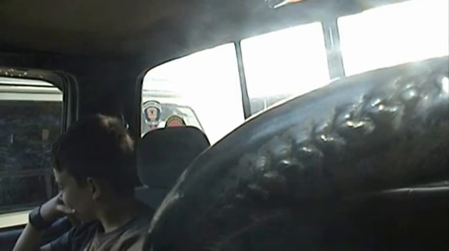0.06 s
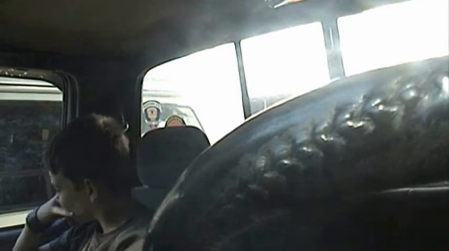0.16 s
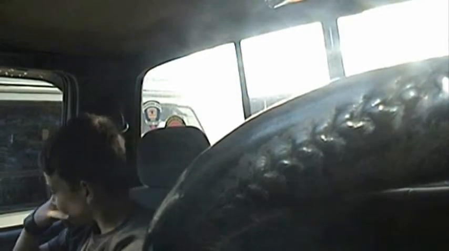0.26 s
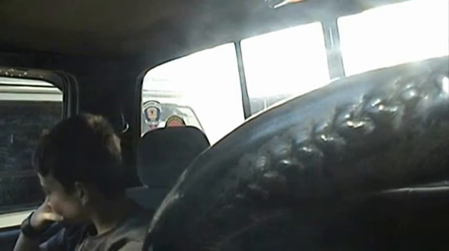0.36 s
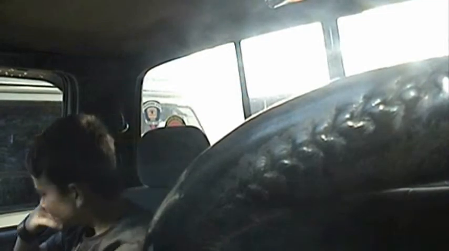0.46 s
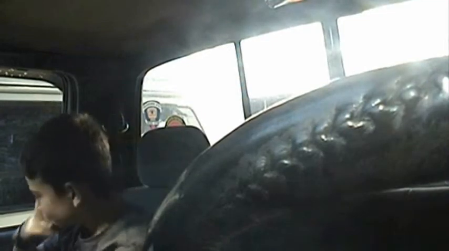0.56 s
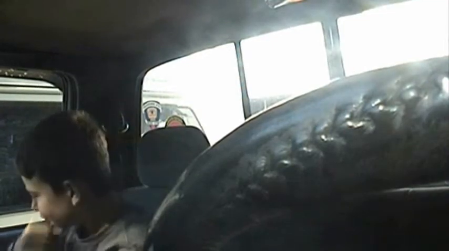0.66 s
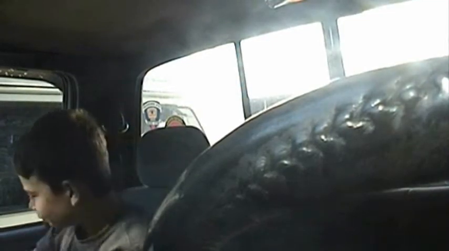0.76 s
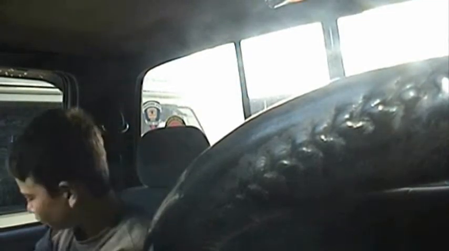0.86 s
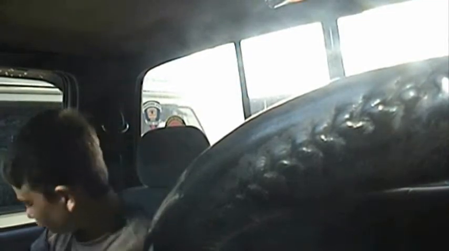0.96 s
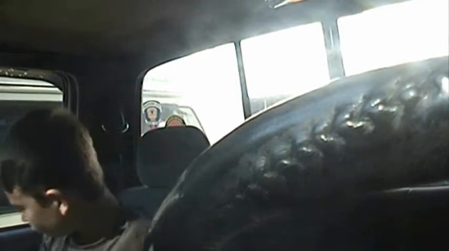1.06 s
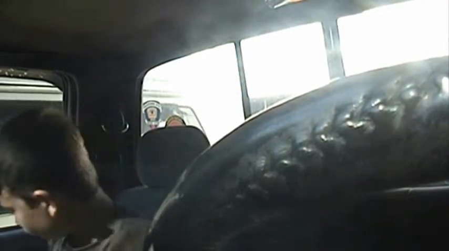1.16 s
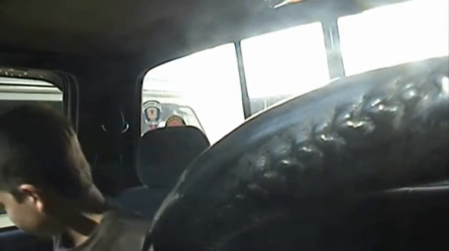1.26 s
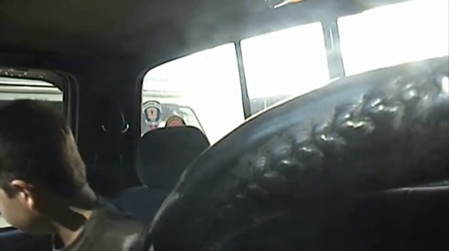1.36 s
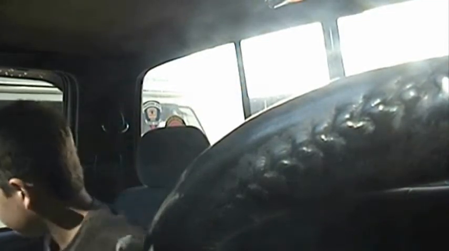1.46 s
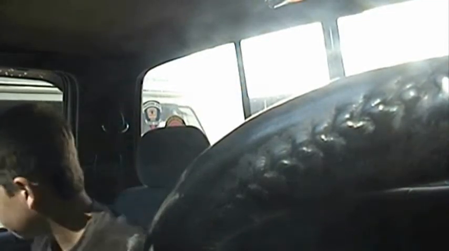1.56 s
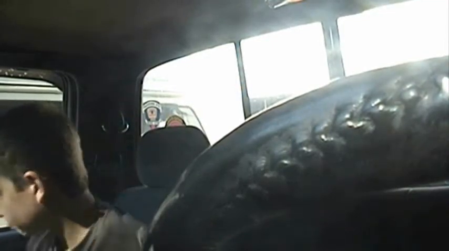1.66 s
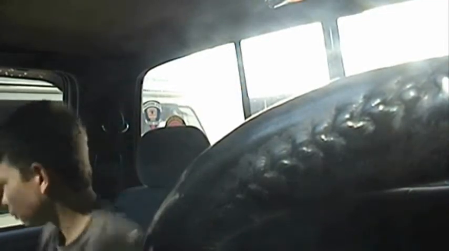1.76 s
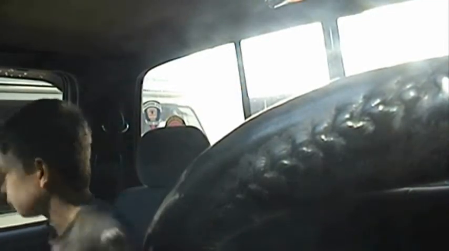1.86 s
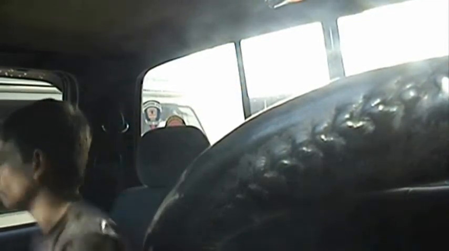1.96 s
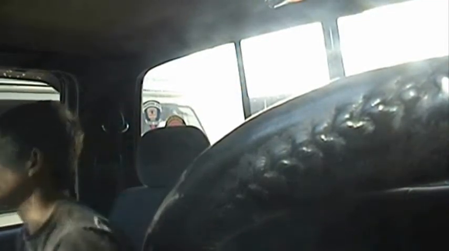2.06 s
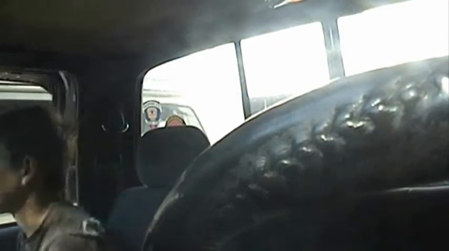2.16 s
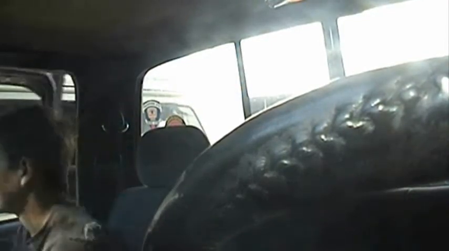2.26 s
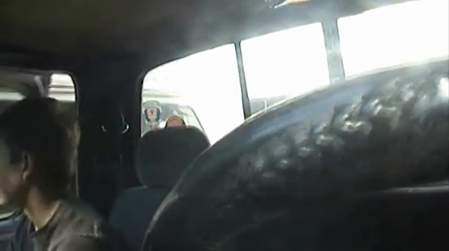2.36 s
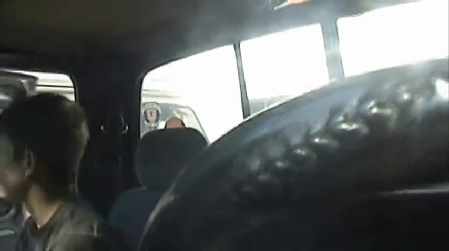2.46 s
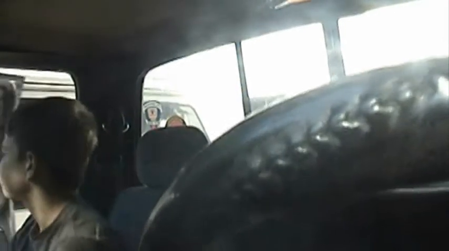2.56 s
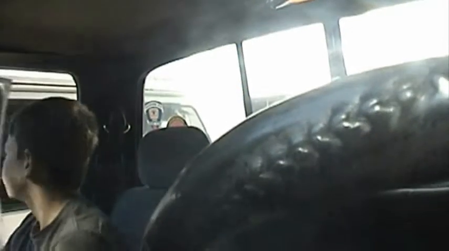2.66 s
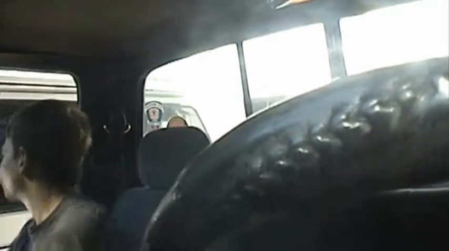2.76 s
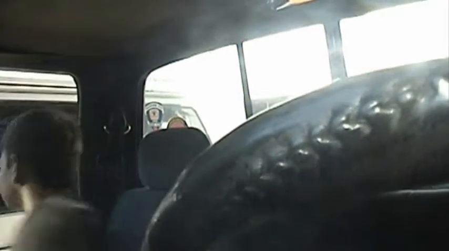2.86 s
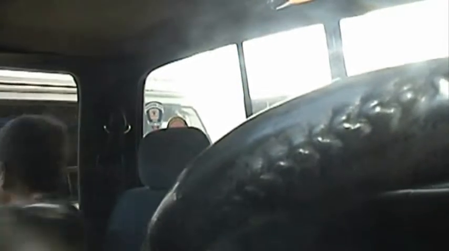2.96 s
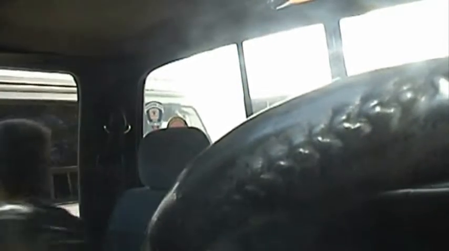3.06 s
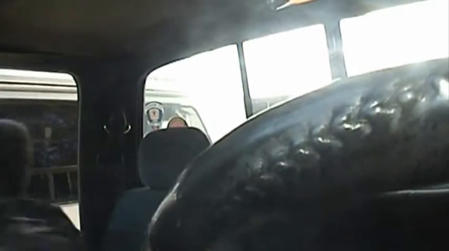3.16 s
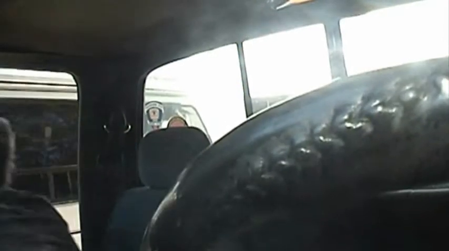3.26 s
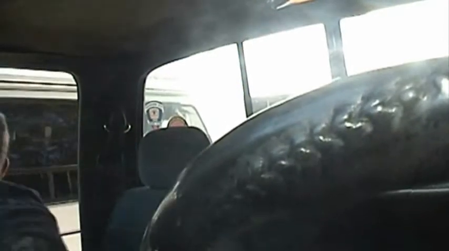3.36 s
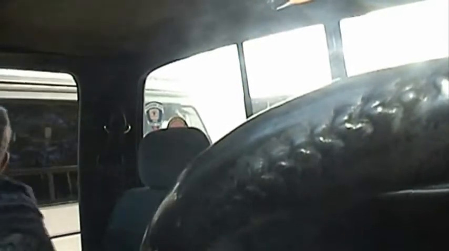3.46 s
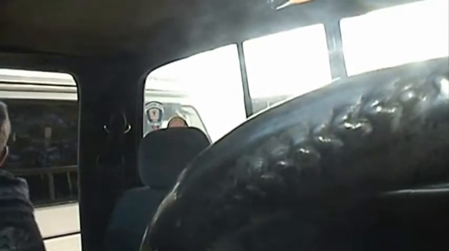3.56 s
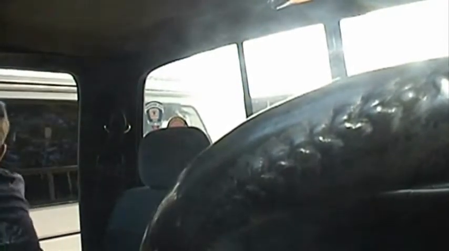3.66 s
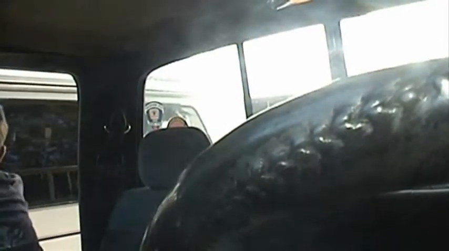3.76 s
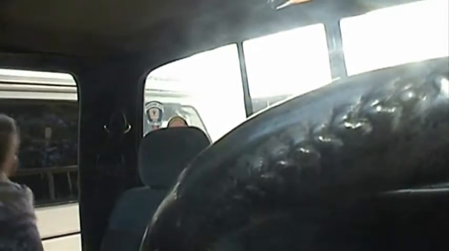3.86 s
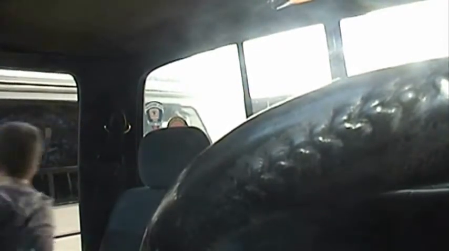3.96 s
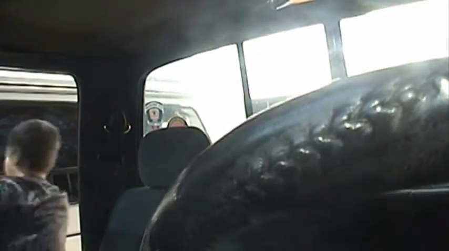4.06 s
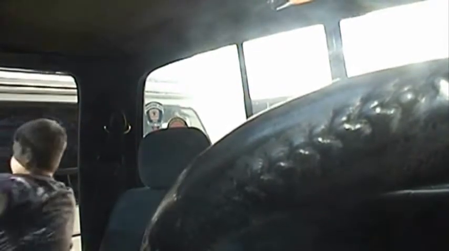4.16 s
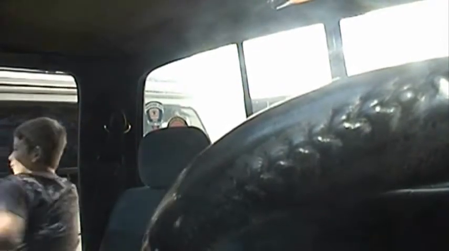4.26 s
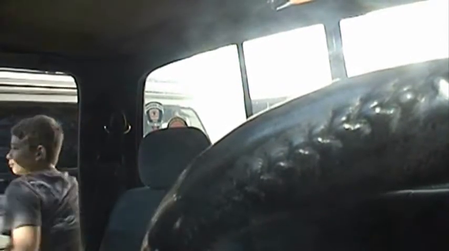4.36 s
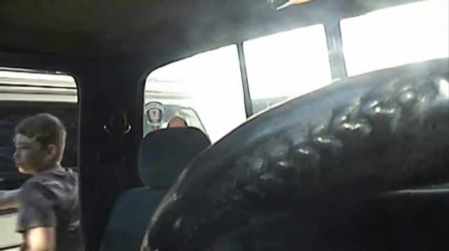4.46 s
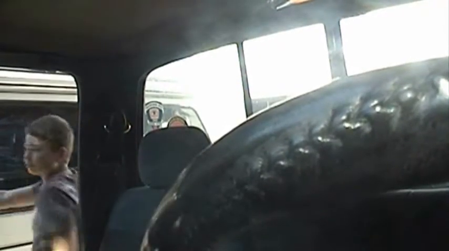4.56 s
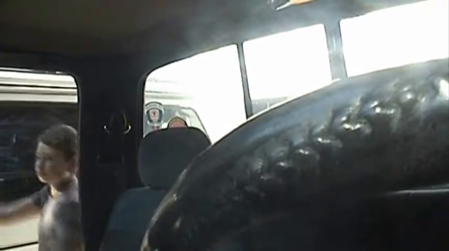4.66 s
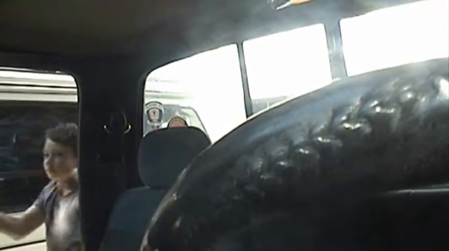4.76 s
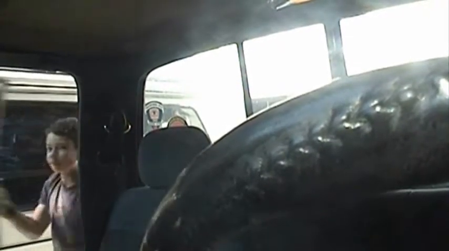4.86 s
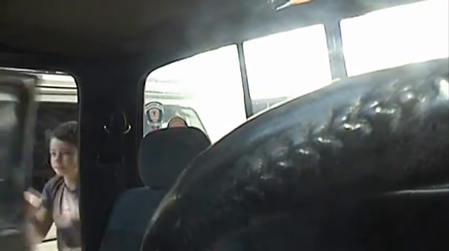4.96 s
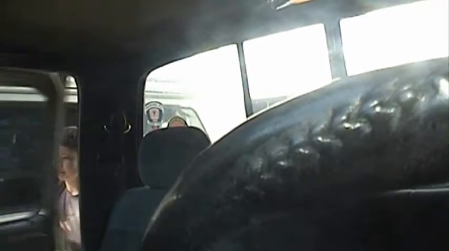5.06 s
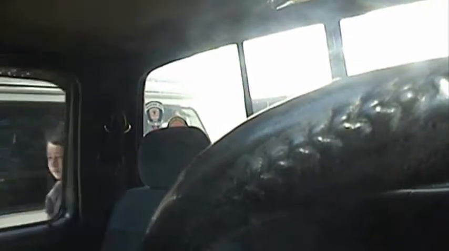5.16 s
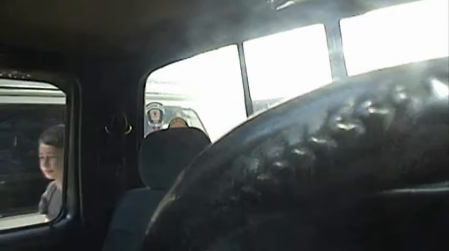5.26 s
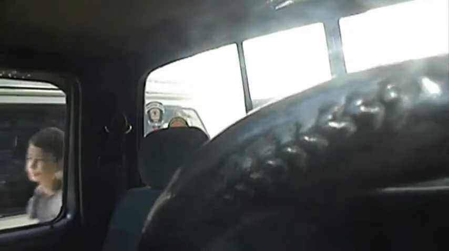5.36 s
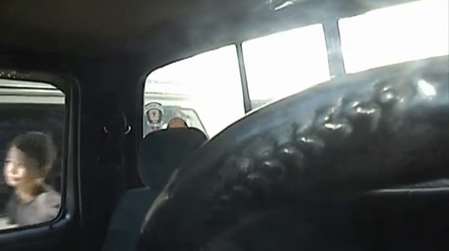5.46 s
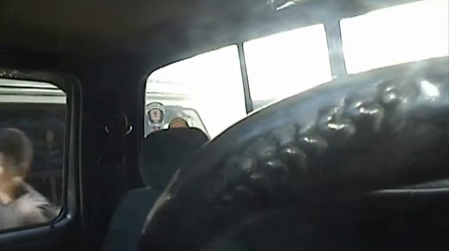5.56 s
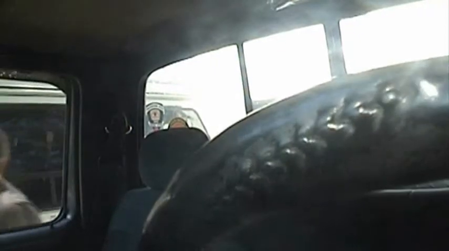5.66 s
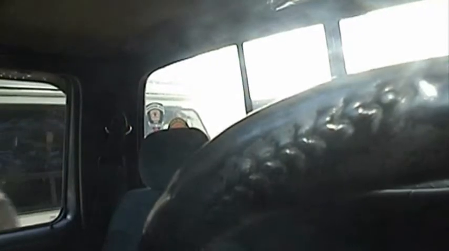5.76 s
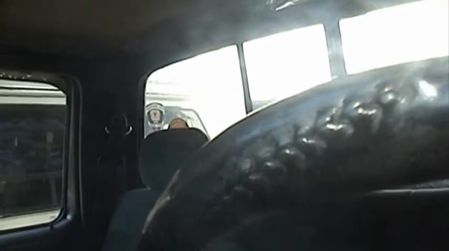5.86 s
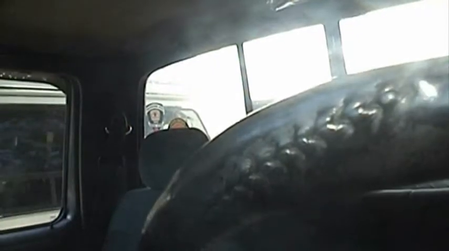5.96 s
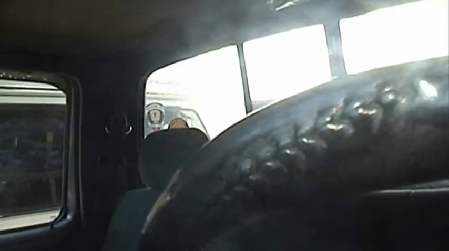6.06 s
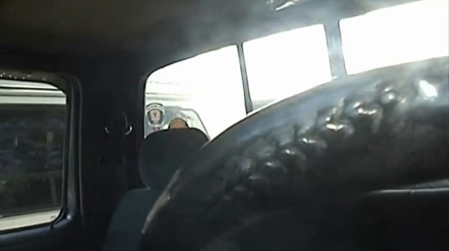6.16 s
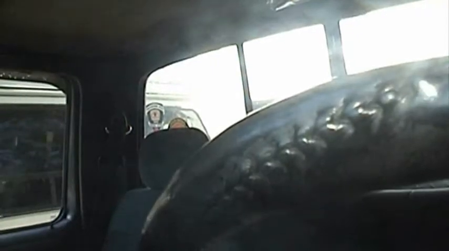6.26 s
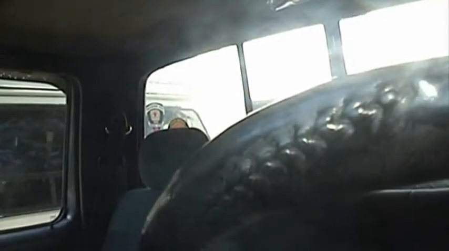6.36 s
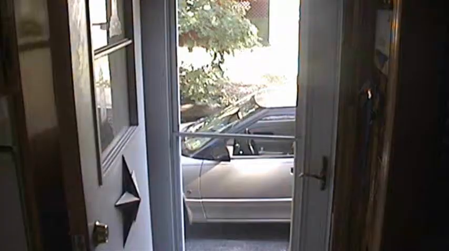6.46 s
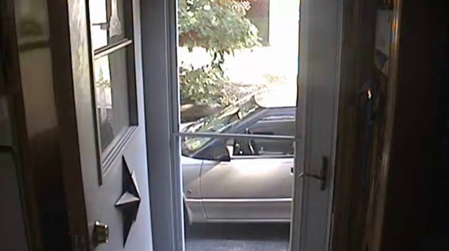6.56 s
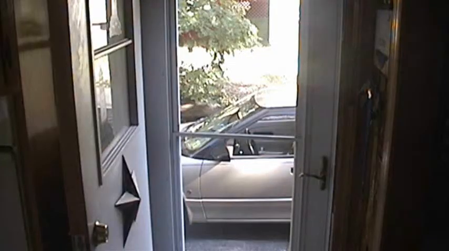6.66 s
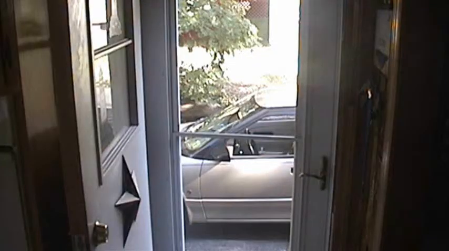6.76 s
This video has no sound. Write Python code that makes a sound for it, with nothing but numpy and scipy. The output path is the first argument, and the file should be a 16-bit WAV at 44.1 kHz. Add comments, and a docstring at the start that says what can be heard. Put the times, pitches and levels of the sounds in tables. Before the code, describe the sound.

Inside a parked truck cab, clothes rustle softly and a seat belt slides back with a faint whistle. The door handle clicks and the door opens with loud clacks and thumps. A passenger climbs out with knocks and scrapes, then slams the door with a metal boom and rattling trim. At the very end, the close cab sound gives way to an airy hallway hush. A faint whine runs throughout.

```python
"""Inside a parked truck cab, a passenger shifts on the seat: cloth rustles and the cab sways on its springs.
The seat belt runs back with a fuzzy whistle. The handle clicks, the door is thrown open, and the
passenger climbs out with bumps and scrapes. A hinge creaks faintly, and at about 5.3 s the door slams:
the sheet metal booms, loose trim rattles and the roof rings on. At 6.5 s the scene changes to the airy
hush of a hallway with an open front door. A faint whine runs under it all."""
import sys
import numpy as np
from scipy import signal
from scipy.fft import rfft, irfft, next_fast_len
from scipy.io import wavfile
from scipy.ndimage import map_coordinates

SR = 44100
rng = np.random.default_rng(int(sys.argv[2]) if len(sys.argv) > 2 else 0)


def dump(signal):
    """Clip the signal to [-1, 1] and save it as 16-bit WAV at the path in sys.argv[1]."""
    limited = np.clip(np.atleast_2d(signal).T, -1, 1)
    pcm = np.round(limited * 32767).astype(np.int16)
    wavfile.write(sys.argv[1], SR, pcm)


N = 299880
TIME = np.arange(N) / SR
DOOR_SHUT_S, HALLWAY_START_S = 5.29, 6.512
CLICK_CREST_DB, THUD_CREST_DB, KNOCK_CREST_DB = 9.5, 5, 8  # allowance for peaks above the average level

# Tone colours of the noises: (frequency [Hz], relative level [dB])
CAB_HUSH = [(20, -1.5), (45, -7.5), (120, -16), (250, -28), (470, -34), (1200, -30.5), (2500, -68),
            (3800, -45), (8000, -48), (15400, -49)]  # still cab and soft hiss
HALLWAY_AIR = [(25, -11), (130, -12.5), (220, -4.5), (310, -8.5), (460, -8.5), (600, -16), (710, -7.5),
               (850, -18.5), (1500, -20), (2100, -26.5), (4500, -34.5), (15400, -48)]  # hallway with an open door
CLOTH_RUSTLE = [(100, -21.5), (250, 4.5), (500, -0.5), (750, -5), (1580, -3.5), (2400, -8), (3500, -14.5),
                (4600, -26.5), (7700, -120)]  # the dull part of rubbing
CLOTH_FIZZ = [(1500, -11.5), (3000, -3.5), (4000, -3), (8800, -11.5), (12500, -19), (15500, -26.5)]  # the bright part of rubbing
STEEL_CLICK = [(150, -38), (450, -4.5), (800, -7), (1270, -2.5), (1600, -3.5), (2700, -7.5), (5500, -10),
               (9300, -19), (11900, -25), (14000, -36.5), (15500, -67)]  # hard parts meeting

# Notes at which parts of the cab ring: (pitch [Hz], width [Hz], gain per pass [dB])
PANEL_NOTES = [(121.2, 20, -3.5), (151.5, 12.7, 1.5), (185.8, 24.4, -0.5), (207.1, 18.5, 0.5),
               (234.1, 24.7, 0.5), (256.4, 30, -1), (285.2, 23.8, -3.5)]  # booming panels
DEEP_NOTES = [(26.5, 14, -1), (50.7, 24, 1), (83.6, 10.8, 2), (105.2, 30, -2.5)]  # cab air and springs
TRIM_NOTES = [(345.6, 55, 0), (462, 49.6, -2.5), (532.6, 36, -1), (585, 34.3, 0), (647.7, 59, -3.5),
              (824, 75, -3), (940, 325, -8), (1125, 183, -5.5), (1261, 64, -7)]  # door lining and dashboard
ROOF_NOTES = [(83.5, 1.6, -9), (141.4, 1.6, -2.5), (170, 1.54, 4), (213, 1.4, -2.5), (238.7, 4.4, -9),
              (370.4, 1.23, -9.5)]  # undamped sheets that ring on

# Faint tones of a small drive: (pitch [Hz], level [dB])
WHINE_TONES = [(899, -69.5), (1782, -68.5), (2998, -72), (3564, -71), (4797, -75)]
# The cab rocking on its springs: (time [s], level [dB])
SWAY_LEVELS = [(0, -37), (0.4, -43), (0.62, -44.5), (0.9, -47), (1.5, -43), (2.4, -38), (3.1, -31),
               (3.75, -40), (4.3, -31.5), (4.55, -46), (4.9, -45), (5.2, -47), (5.9, -35), (6.5, -57)]
# The passenger stirring on the seat and in the doorway: (time [s], level [dB], treble share [dB])
STIR_LEVELS = [(0, -43.5, -5.5), (0.42, -48.5, -5.5), (0.55, -43.5, -6.5), (0.72, -44, -5.5),
               (1.06, -41, -7), (1.27, -45, 0), (1.6, -47, -2.5), (2.07, -53.5, 2), (2.3, -43.5, -8),
               (2.77, -38.5, -9), (2.97, -42, -5.5), (3.33, -34, -11), (3.75, -41, -7.5), (3.93, -38, -4),
               (4.04, -42.5, -3.5), (4.24, -41, -6), (4.3, -48.5, -9), (4.68, -56.5, -4),
               (5.2, -49.5, -8.5), (5.5, -42.5, -8.5), (5.85, -54.5, -10), (6.1, -58, -5.5)]
# Single drags of cloth, linkage and door seal: (time [s], hold [s], level [dB], treble share [dB])
DRAGS = [(0.14, 0.1, -42, -8), (1.709, 0.05, -36, -2), (1.875, 0.0074, -34, -9.5),
         (1.95, 0.042, -33.5, -15), (2.129, 0.003, -25, -4.5), (2.53, 0.064, -21, -4),
         (2.625, 0.032, -21, -3), (2.995, 0.031, -36, -4.5), (3.86, 0.14, -38, -12.5),
         (4.1, 0.058, -35, -21), (4.721, 0.1, -39, -8.5), (5.027, 0.013, -34, -6),
         (5.309, 0.04, -25.5, -13.5), (5.37, 0.072, -28, -12.5)]
# The belt running back: (time [s], level [dB], upper whistle share [dB], pitch [Hz])
BELT_RUN = [(1.2, -50, -21, 2025), (1.27, -41.5, -5, 2097), (1.45, -39, -9.5, 1994), (1.49, -47, -20, 1996),
            (1.54, -47.5, -26, 1974), (1.68, -43, -27, 1940), (1.76, -39, -27, 1900)]
# Knocks on hollow plastic and steel parts, and a faint hinge creak just before the slam (at 5.175 s):
# (time [s], level [dB], pitch [Hz], time to fade 60 dB [s])
KNOCKS_AND_CREAK = [(0.177, -34, 6900, .05), (0.229, -33, 8800, 0.078), (1.13, -22, 600, 0.06),
                    (1.752, -17, 2730, 0.067), (2.122, 0, 152, 0.034), (2.146, -3, 1184, 0.088),
                    (2.214, -9, 2970, 0.055), (2.477, 1, 1263, 0.072), (2.621, -5, 1160, .06),
                    (2.626, -13, 4840, .05), (3.482, -7, 824, 0.09), (3.849, -25, 990, 0.065),
                    (4.006, -20, 1200, 0.14), (4.068, -21, 2680, 0.042), (4.397, -25, 796, 0.086),
                    (4.714, -12.5, 470, 0.05), (4.824, -14, 552, 0.14), (5.015, -21.5, 643, 0.096),
                    (5.03, -22, 1750, 0.094), (5.175, -37, 2070, 0.27), (5.297, -3, 1130, 0.04),
                    (5.298, -6.5, 4200, .045), (5.317, -8, 1150, 0.036), (5.325, -3, 85, 0.27),
                    (5.335, -7, 230.6, 0.47), (5.425, 0, 82.7, 0.36), (5.56, -6, 163.2, 0.47),
                    (5.421, -7, 1470, 0.036)]
# Hard contacts of latch, handle, buckle, trim and shoes:
# (time [s], level [dB], treble tilt [dB per octave], time for the echo to fade 60 dB [s])
HARD_HITS = [(0.175, -36, 12, 0.063), (0.2225, -34, 0, 0.075), (0.2293, -29, 6.5, 0.091),
             (0.318, -39, 1, 0.045), (0.339, -41, 11, 0.05), (0.681, -24, 3, 0.075),
             (1.1314, -22, -12, 0.09), (1.7506, -17.5, 0, 0.12), (1.839, -24, 0.5, 0.18),
             (1.8642, -32, 5, 0.081), (1.9227, -19, 2, 0.08), (1.9548, -12, 4.5, 0.11),
             (2.1461, -5, -10, 0.093), (2.2075, -4.5, 3, 0.072), (2.2153, -9.5, 2, 0.13),
             (2.4771, 2.5, -1.5, 0.11), (2.4827, -1, 3, 0.091), (2.524, -8, -4, 0.022),
             (2.545, -3.5, -1.5, 0.073), (2.557, -11.5, 3.5, 0.11), (2.585, -14, -1, .07),
             (2.6223, -3.5, -2.5, 0.071), (2.642, -19, 1, 0.041), (2.65, -9.5, 3, 0.093),
             (2.673, -17, 0, .06), (2.6963, -12, -0.5, 0.057), (2.734, -17, 0.5, 0.073),
             (2.845, -17.5, -7, 0.04), (3.0118, -20.5, 2.5, 0.065), (3.2276, -14.5, -7, 0.085),
             (3.3863, -17.5, -7, 0.056), (3.481, -7.5, -10, 0.15), (3.6391, -16.5, -1.5, 0.074),
             (3.846, -20, -1, 0.091), (3.9974, -19, -3, 0.14), (4.0665, -8, -1.5, 0.096),
             (4.0882, -9.5, -2, .1), (4.1551, -24, -4.5, 0.081), (4.327, -24.5, -2, 0.1),
             (4.3517, -28.5, -3, 0.13), (4.383, -25, -3, 0.094), (4.3976, -19, -3, 0.09),
             (4.5643, -31.5, -4.5, 0.088), (4.6958, -22, -3.5, 0.12), (4.79, -33, -5, 0.069),
             (4.809, -32, -7, 0.092), (4.826, -17, -5.5, 0.08), (5.18, -36.5, 1, 0.13),
             (5.255, -25, -0.5, 0.076), (5.296, -2, 0.5, 0.094), (5.3025, -0.5, -15, 0.064),
             (5.309, -9, -8, 0.036), (5.319, -20, 2, .06), (5.344, -11, 3, 0.067),
             (5.4204, -9.5, 3.5, 0.058), (5.4684, -17, -7, 0.14), (5.506, -26.5, -3.5, 0.2),
             (5.545, -19.5, -5.5, .1), (5.6136, -21.5, -7.5, 0.059), (5.7215, -21, -11, 0.073)]
# Soft blows on the cab shell:
# (time [s], boom level [dB], deep share [dB], trim share [dB], time for the boom to fade 60 dB [s])
SHELL_BLOWS = [(0.009, -25, 0.5, -8, 0.4), (0.462, -12.5, -24, -11.5, 0.51), (0.495, -11, -26, -5.5, 0.23),
               (0.668, -25, -3, -3, 0.43), (1.002, -28, -24, -3.5, 0.58), (1.121, -28.5, -9.5, 1, 0.36),
               (1.169, -21.5, -1, -5.5, 0.36), (1.447, -31, -3.5, -2.5, 0.85), (1.698, -16.5, 1, -6, 0.28),
               (1.839, -26.5, -3.5, 1.5, 0.85), (1.886, -20.5, 1, -6, 0.56), (1.946, -13.5, 1, -2, 0.4),
               (2.121, -14, -1, 2, 0.62), (2.318, -36.5, -1, 11, 0.4), (2.409, -32, -9, 4.5, 1),
               (2.484, -2.5, 1, -1, 0.36), (2.546, -3.5, 1.5, 1, 0.44), (2.619, -8.5, 1.5, -4.5, 0.82),
               (2.687, -6, -10, -9.5, 0.94), (2.838, -18.5, -12, -1, 0.31), (3.187, -5.5, -6, -9.5, 0.63),
               (3.389, -17.5, -1.5, -14, 1), (3.49, -11, -13.5, -4.5, 0.28), (3.537, -22, 7.5, 2, 0.25),
               (3.657, -43, 21, -13, 0.26), (3.995, -24.5, -23, 0, 0.51), (4.067, -12.5, 7, -3, 0.28),
               (4.088, -12, 3, -8.5, 0.25), (4.4, -42, -1, 15.5, 0.25), (4.704, -32, -2, 7.5, 0.69),
               (4.828, -40, 3, 15, 0.14), (5.012, -38.5, 13.5, 1, 0.3), (5.267, -18.5, -9, 3, 0.3),
               (5.302, -9.5, 3, -8, 0.4), (5.345, -7.5, -7, -3.5, 0.59), (5.395, -6, -2, -3, 0.42),
               (5.457, -11, 3, -4, 0.72), (5.549, -9, -9, -9.5, 0.34), (5.619, -24, -7, -5, 0.97),
               (5.729, -28.5, -21, -6, 1)]
# Stereo width: (frequency [Hz], gain on the left-right difference [dB])
STEREO_WIDTH = [(60, -26), (200, -27), (700, -15), (2400, -9.5), (5500, -5.5), (9000, 0), (15000, 0.5)]


def amp(db):
    """Turn decibels into a number to multiply by."""
    return 10 ** (np.asarray(db) / 20)


def unit(x):
    """Scale a signal to an average (rms) level of 1."""
    return x / np.sqrt(np.mean(x ** 2) + 1e-20)


def along(points, hz):
    """Read between (frequency, value) points on a log frequency axis."""
    freqs, values = np.transpose(points)
    return np.interp(np.log(hz + 1), np.log(freqs + 1), values)


def curves(rows):
    """Join timed rows with straight lines: one curve for each column after the time."""
    times, *columns = np.transpose(rows)
    return [np.interp(TIME, times, column) for column in columns]


def wobble(rate):
    """A smooth random curve through `rate` random values a second."""
    return map_coordinates(rng.standard_normal(int(N * rate / SR) + 4), [TIME * rate])


def filtered(x, response):
    """Weight each frequency in x by response(frequency)."""
    size = x.shape[-1]
    padded = next_fast_len(size + 8192)
    return irfft(rfft(x, padded) * response(np.fft.rfftfreq(padded, 1 / SR)), padded)[..., :size]


def noise(colour, tilt_db=0, size=N):
    """Two unrelated noises of one tone colour: the direct sound and the scattered sound."""
    gain = lambda hz: amp(along(colour, hz) + tilt_db * np.log2(np.maximum(hz, 600) / 3000))
    return unit(filtered(rng.standard_normal((2, size)), gain))


def resonance(notes, hz):
    """How a part that rings at these notes answers each frequency."""
    return sum((-1) ** k * amp(db) * 1j * hz * width / (pitch ** 2 - hz ** 2 + 1j * hz * width)
               for k, (pitch, width, db) in enumerate(notes))


def ringing_noise(notes):
    """Two noises passed twice through the resonances, so the gaps between the notes stay quiet."""
    return unit(filtered(rng.standard_normal((2, N)), lambda hz: resonance(notes, hz) ** 2))


def background():
    """A drive whines faintly throughout; the hush of the cab gives way to the airier hallway."""
    whine = sum(amp(db + 2 * wobble(27)) * np.sin(2 * np.pi * hz * TIME) for hz, db in WHINE_TONES)
    hallway = amp(-41.5 + 0.8 * wobble(15)) * noise(HALLWAY_AIR)
    cab = amp(-45) * noise(CAB_HUSH)
    return whine + np.where(TIME > HALLWAY_START_S, hallway, cab)


def cab_sway():
    """The cab rocks on its springs with a low rumble."""
    return amp(curves(SWAY_LEVELS)[0]) * ringing_noise(DEEP_NOTES)


def rubbing():
    """Cloth, linkage and door seal drag in clumps of tiny slips."""
    stir_db, treble_db = curves(STIR_LEVELS)
    rustle_power, fizz_power = amp(stir_db) ** 2, amp(stir_db + treble_db) ** 2
    rise_db_per_s, fall_db_per_s = 377, 257
    for start, hold, db, share_db in DRAGS:
        before, after = np.maximum(start - TIME, 0), np.maximum(TIME - start - hold, 0)
        drag_db = db - rise_db_per_s * before - fall_db_per_s * after
        rustle_power += amp(drag_db) ** 2
        fizz_power += amp(drag_db + share_db) ** 2
    clumps_db = 1.1 * wobble(30) + 1.6 * wobble(130)
    rustle = np.sqrt(rustle_power) * amp(clumps_db) * noise(CLOTH_RUSTLE)
    fizz = np.sqrt(fizz_power) * amp(0.85 * clumps_db + 0.55 * wobble(500)) * noise(CLOTH_FIZZ)
    return rustle + fizz


def seat_belt():
    """The strap runs through its guide: two fuzzy whistles that follow its speed."""
    db, upper_db, hz = curves(BELT_RUN)
    running = (TIME > BELT_RUN[0][0]) & (TIME < BELT_RUN[-1][0])
    phase = 2 * np.pi * np.cumsum(hz) / SR
    fuzz = lambda: np.array([wobble(420), wobble(420)])
    whistle = lambda angle: fuzz() * np.sin(angle) + fuzz() * np.cos(angle)
    return running * amp(db) * (whistle(phase) + amp(upper_db) * whistle(2.24 * phase))


def knocks_and_creak():
    """A struck hollow part or the creaking hinge rings roughly at its own note and one just below."""
    out, t = np.zeros(N + SR), np.arange(SR // 2) / SR
    attack = 1 - np.exp(-t / 0.00045)
    for start, db, hz, fade_s in KNOCKS_AND_CREAK:
        note = np.sin(2 * np.pi * hz * t)
        neighbour = 0.5 * np.sin(2 * np.pi * 0.96 * hz * t + rng.uniform(0, 2 * np.pi))
        loudness = attack * amp(db - KNOCK_CREST_DB - 60 * t / fade_s)
        out[round(start * SR):][:len(t)] += loudness * (note + neighbour)
    rough = out[:N] * amp(2.8 * wobble(220))
    return np.array([rough, 0.4 * rough])  # direct, scattered


def hard_clicks():
    """A sharp, chattering crack, then its slightly duller echo off glass and steel."""
    out, t = np.zeros((2, N + SR)), np.arange(SR // 4) / SR
    attack = 1 - np.exp(-t / 0.00064)
    crack_fade_s, chatter_db = 0.017, 2.5
    for start, db, tilt_db, echo_fade_s in HARD_HITS:
        crack = amp(-60 * t / crack_fade_s) * noise(STEEL_CLICK, tilt_db, size=len(t))
        echo = 1.196 * amp(-60 * t / echo_fade_s) * noise(STEEL_CLICK, tilt_db - 0.6, size=len(t))
        out[:, round(start * SR):][:, :len(t)] += amp(db - CLICK_CREST_DB) * attack * (crack + echo)
    return out[:, :N] * amp(chatter_db * wobble(300))


def cab_thuds():
    """Each bump or slam shakes panels, cab air and trim; the trim fades first, the roof rings on."""
    panels, deep, trim = np.zeros((3, N + 2 * SR))
    t = np.arange(2 * SR) / SR
    swell = 1 - np.exp(-t / 0.0064)
    for start, db, deep_db, trim_db, fade_s in SHELL_BLOWS:
        for power, share_db, drop_db in ((panels, 0, 60), (deep, deep_db, 55), (trim, trim_db, 100)):
            loudness = swell * amp(db + share_db - THUD_CREST_DB - drop_db * t / fade_s)
            power[round(start * SR):][:len(t)] += loudness ** 2
    parts = ((panels, PANEL_NOTES), (deep, DEEP_NOTES), (trim, TRIM_NOTES))
    shaking = sum(np.sqrt(power[:N]) * ringing_noise(notes) for power, notes in parts)
    push_db = np.where(TIME > DOOR_SHUT_S, 8, 1.5)  # a sealed cab loses less of the blow
    roof = filtered(amp(push_db) * shaking, lambda hz: resonance(ROOF_NOTES, hz))
    return shaking + roof


def scene():
    """Mix for two close listening points: left and right are alike in the bass, unlike in the treble."""
    in_cab = TIME < HALLWAY_START_S
    contacts = in_cab * cab_thuds() + hard_clicks() + knocks_and_creak()
    movement = in_cab * (rubbing() + cab_sway()) + seat_belt()
    direct, scattered = contacts + movement + background()
    shifted = signal.hilbert(direct).imag  # the gap between the points gives a quarter-cycle shift
    difference = 0.13 * direct - 0.68 * shifted + 1.06 * scattered
    side = filtered(difference, lambda hz: amp(along(STEREO_WIDTH, hz)))
    return np.array([direct + side, direct - side])


def record(dry):
    """Round off the loudest peaks, then remove the deepest rumble and the highest treble."""
    ceiling, low_hz, top_hz = 1.05, 18, 15570
    rounded = dry / (1 + np.abs(dry / ceiling) ** 5) ** (1 / 5)
    return filtered(rounded, lambda hz: (hz < top_hz) * hz ** 2 / (low_hz ** 2 + hz ** 2))


dry = scene()
out = record(dry)
dump(out)
```